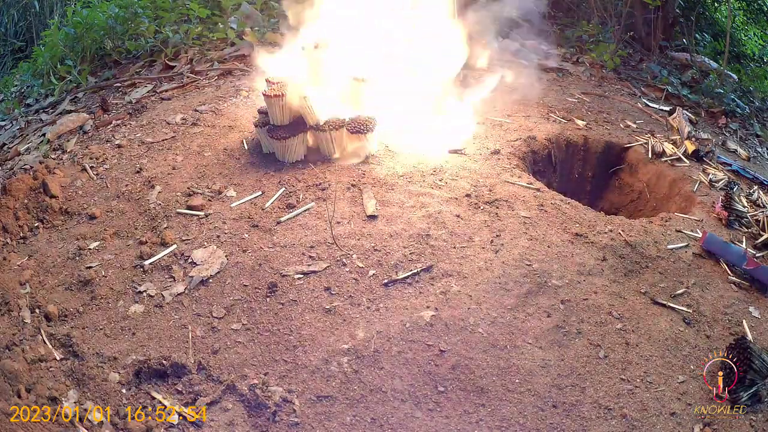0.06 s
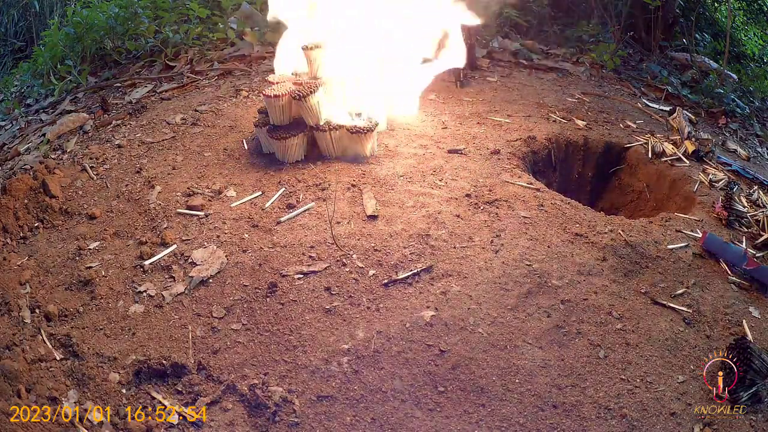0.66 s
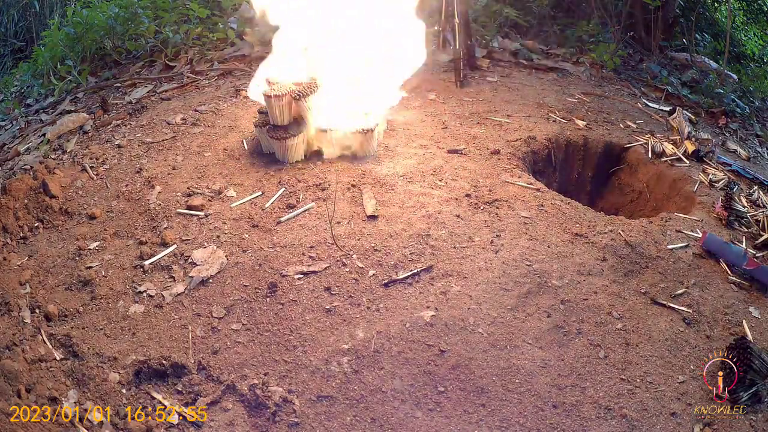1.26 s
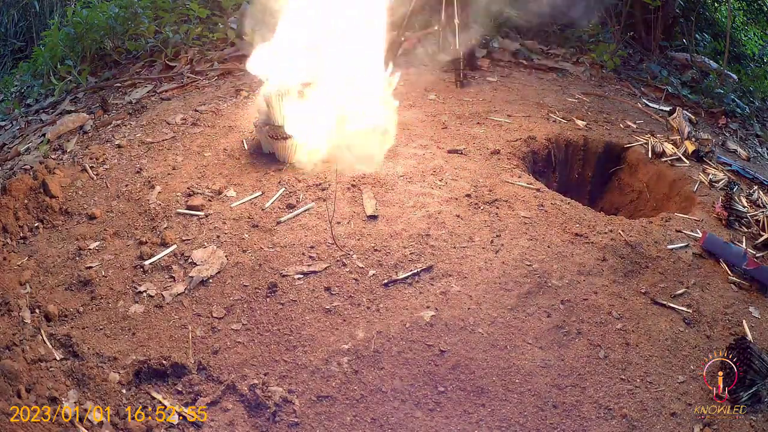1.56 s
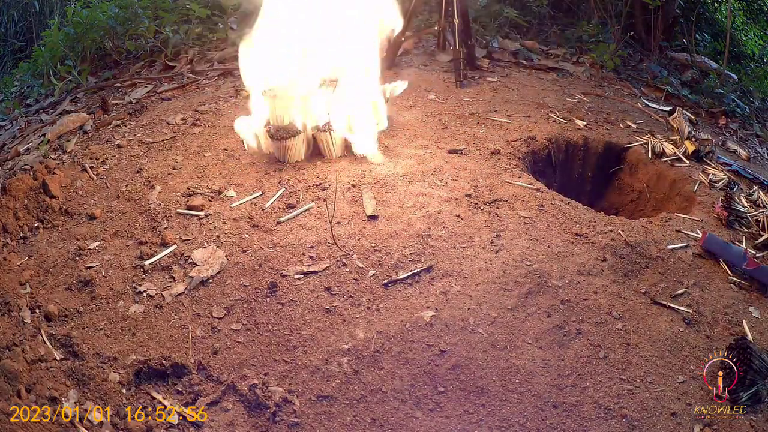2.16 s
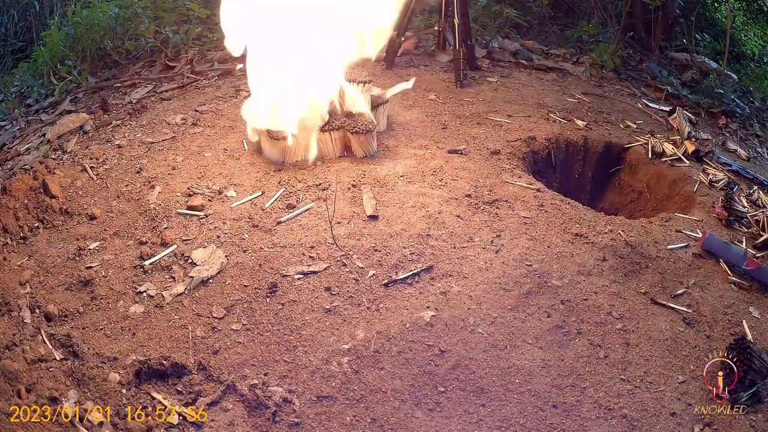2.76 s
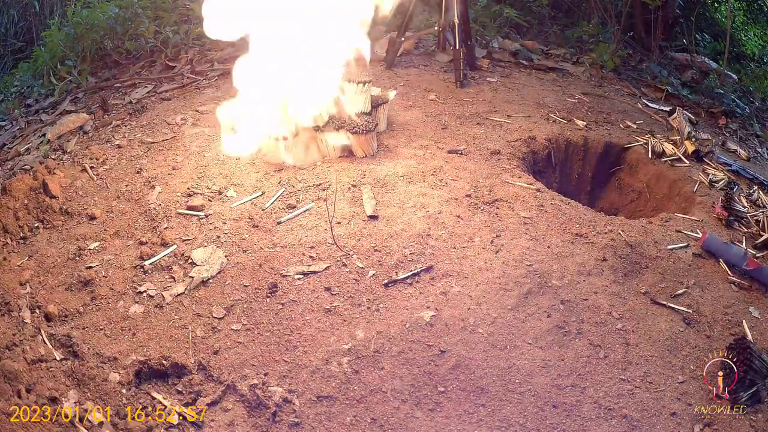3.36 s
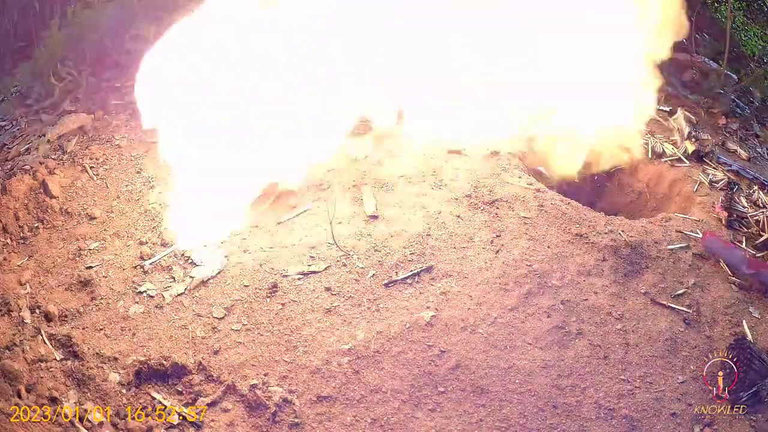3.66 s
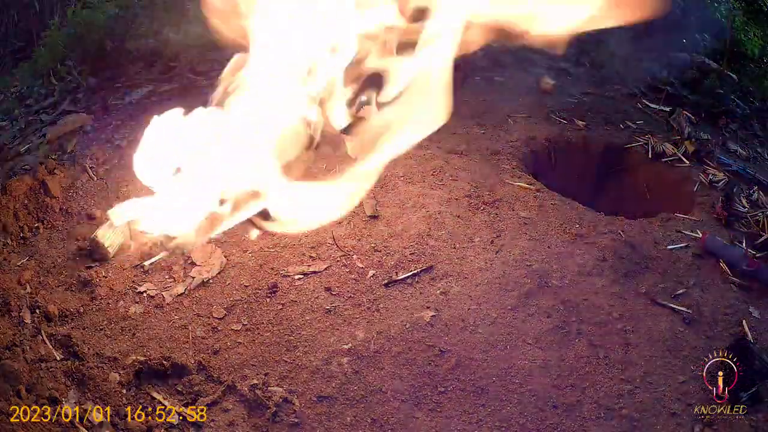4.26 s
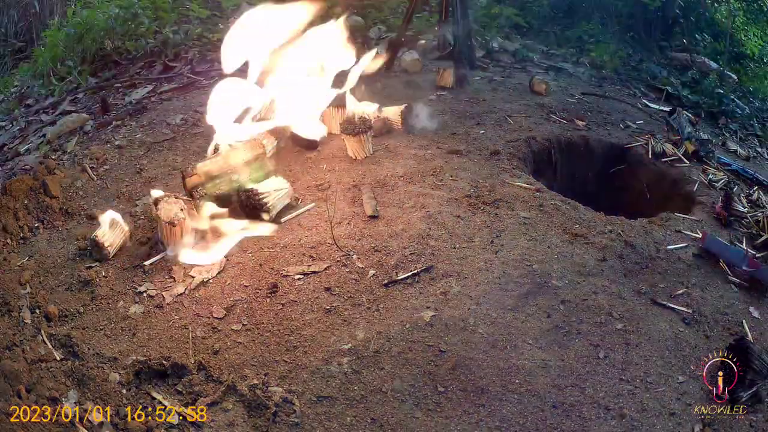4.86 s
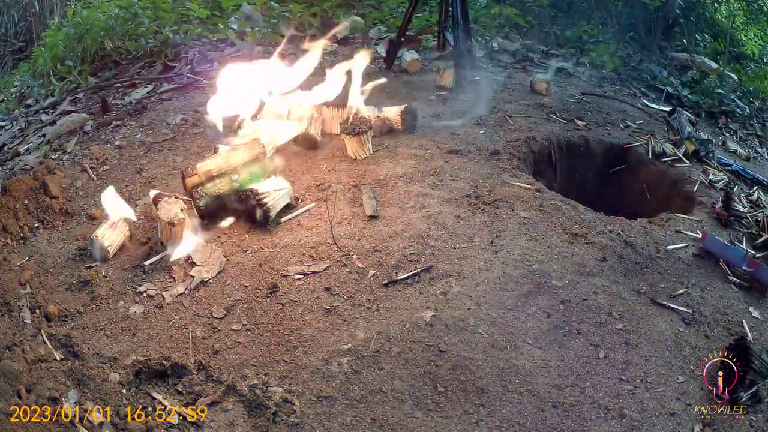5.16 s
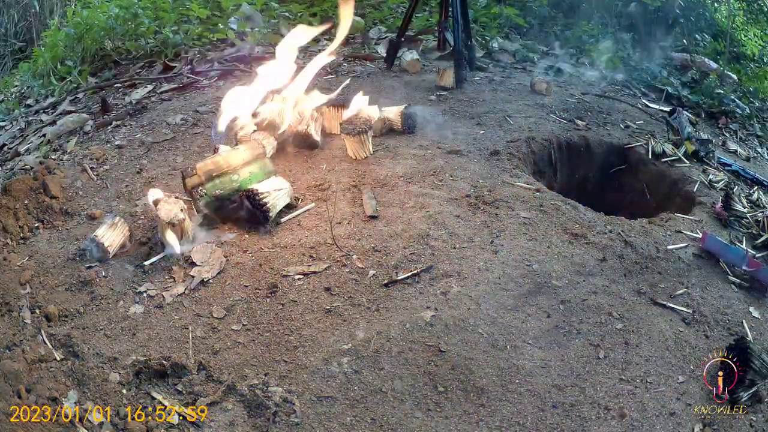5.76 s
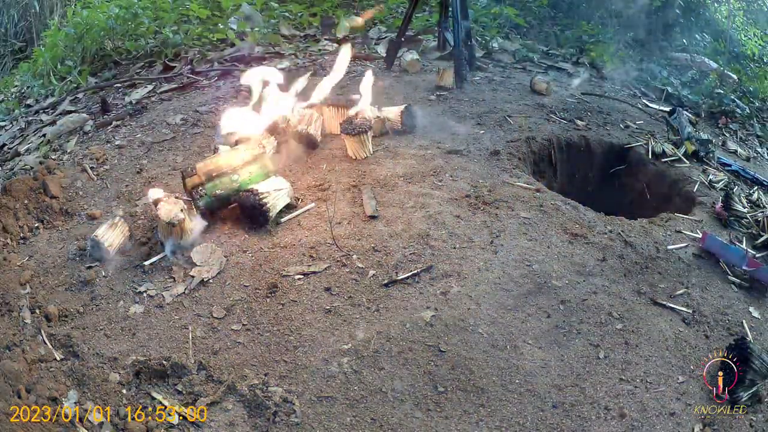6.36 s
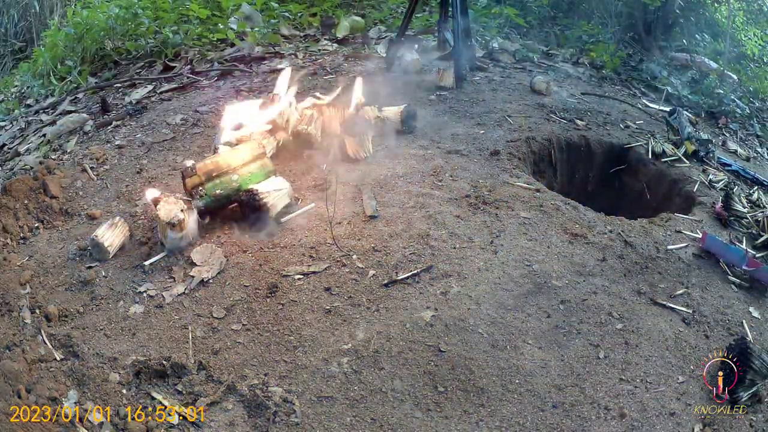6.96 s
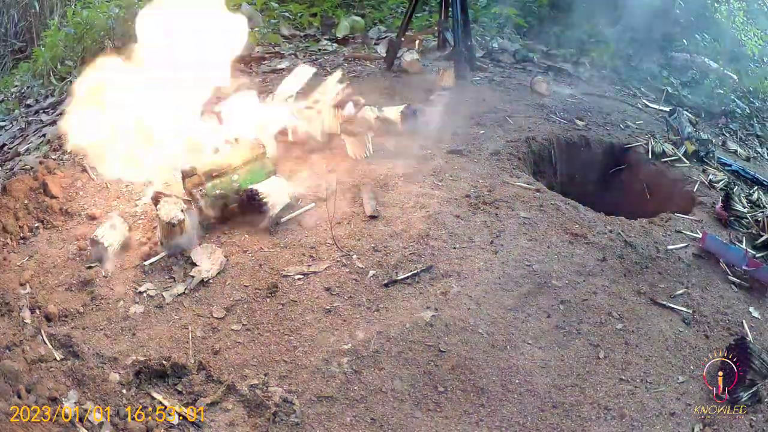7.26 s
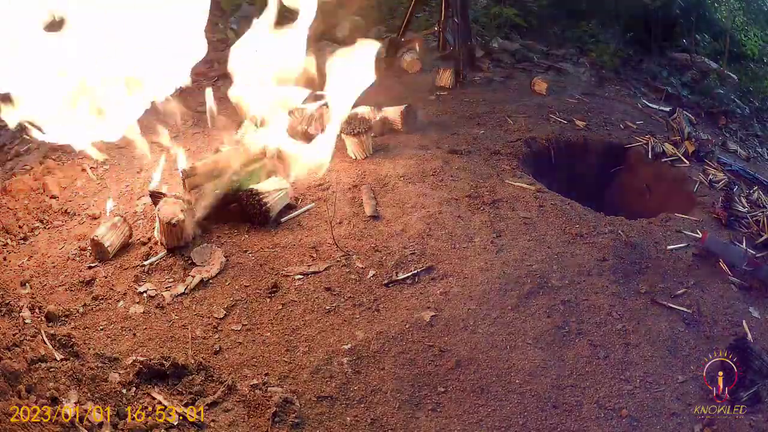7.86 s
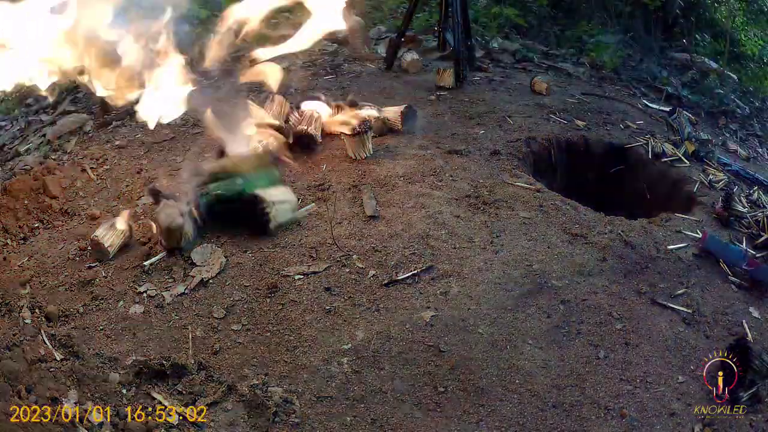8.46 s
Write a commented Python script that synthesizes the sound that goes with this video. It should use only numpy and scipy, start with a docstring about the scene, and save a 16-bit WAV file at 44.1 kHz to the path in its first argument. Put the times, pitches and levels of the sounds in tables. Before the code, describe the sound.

Bundles of matches flare with a sputtering roar outdoors, interrupted by a sharp firecracker bang, then flare again until a second bang.

```python
"""Bundles of matches flare on bare earth with a sputtering roar and a hiss. At 3.6 s a firecracker
bursts and scatters them, and the strewn heads go up in one whoosh. The fire sinks to a flutter with
small pops, and steady insects can be heard in the trees. At 7.2 s a second heap catches with a whoomph,
sizzles and pops, until another firecracker blows it out at 8.5 s. Both blasts overload the microphone."""
import sys
import numpy as np
from scipy import signal
from scipy.fft import rfft, irfft, next_fast_len
from scipy.io import wavfile
from scipy.ndimage import uniform_filter1d, map_coordinates

SR = 44100
rng = np.random.default_rng(int(sys.argv[2]) if len(sys.argv) > 2 else 0)


def materialize(psi):
    """Save the field psi as 16-bit PCM at rate SR to the path in sys.argv[1].

    A 1-D psi becomes a single channel; in a 2-D psi each row is a channel.
    """
    bounded = np.clip(np.atleast_2d(psi).T, -1, 1)
    quanta = np.round(bounded * 32767).astype(np.int16)
    wavfile.write(sys.argv[1], SR, quanta)


N = 383229

# The two firecrackers; a "fade" is the time to fall by 60 dB:
# (time [s], crack [dB], crack fade [s], snap [dB], gas jet [dB], jet length [s], jet fade [s])
FIRECRACKERS = [(3.591, 3, 0.064, -15.5, -11.5, 0.08, 0.11), (8.5152, 1, 0.087, -3.5, -21.5, 0.024, 0.15)]


def amp(db):
    """Turn decibels into a gain."""
    return np.exp(np.asarray(db) * np.log(10) / 20)


def unit(x):
    """Scale a signal to an average (rms) strength of 1."""
    return x / np.sqrt(np.mean(x ** 2) + 1e-20)


def clock():
    """The time of every sample, in seconds."""
    return np.arange(N) / SR


def curves(rows):
    """Join a table's rows with straight lines: one curve for each column after the time."""
    times, *columns = np.transpose(rows)
    return [np.interp(clock(), times, column) for column in columns]


def wobble(rate):
    """A smooth curve through `rate` random values a second."""
    t = clock()
    coarse = t[::100]
    values = rng.standard_normal(int(N * rate / SR) + 4)
    return np.interp(t, coarse, map_coordinates(values, [coarse * rate]))


def filtered(x, response):
    """Scale each frequency in x by the gain that response(hz) gives."""
    size = next_fast_len(N + SR // 4)
    return irfft(rfft(x, size) * response(np.fft.rfftfreq(size, 1 / SR)), size)[:N]


def coloured(x, tone):
    """Give x the balance of low and high notes in a tone table, at strength 1."""
    freqs, db = np.transpose(tone)
    return unit(filtered(x, lambda hz: amp(np.interp(np.log(hz + 1), np.log(freqs), db))))


def noise(tone):
    """Steady noise with the given tone, at strength 1."""
    return coloured(rng.standard_normal(N), tone)


def sputter(rate, spread_db, grain_db):
    """Rushing gas plus tiny ignitions of uneven size, about `rate` a second."""
    sizes = amp(spread_db * np.minimum(rng.exponential(size=N), 4))
    sparks = (rng.random(N) < rate / SR) * sizes
    return unit(rng.standard_normal(N) + amp(grain_db) * unit(sparks - sparks.mean()))


def alight(start, end, rise):
    """Heads catch within the rise time before the start and burn out quickly after the end."""
    t = clock()
    catch_db = -60 * np.maximum(start - t, 0) / rise
    burn_out_db = -60 * np.maximum(t - end, 0) / .25
    return amp(np.maximum(catch_db + burn_out_db, -120))


def forest():
    """Insects shrill steadily over a faint, even hiss."""
    # Tones of the insects and the air: (frequency [Hz], relative level [dB])
    insect_tone = [(3000, -40.5), (6600, -21.5), (7050, -5.5), (7400, 0.5), (7700, -6), (8100, -19.5),
                   (12000, -46)]
    air_tone = [(25, 0), (1000, 8.5), (6000, 0), (14500, -0.5), (16000, -7.5)]
    return amp(-61.5 + .7 * wobble(7.4)) * noise(insect_tone) + amp(-61.0) * noise(air_tone)


def wood_flames():
    """The sticks kindle slowly under the flare, then burn on with a soft flutter and faint crackles."""
    # Loudness of the small flames: (time [s], level [dB])
    levels = [(4.8, -48), (5.2, -54), (5.45, -51.5), (6.2, -52), (6.55, -55.5)]
    # Their tone: (frequency [Hz], relative level [dB])
    tone = [(25, -4), (130, 1.5), (450, 0.5), (900, -7), (2000, -16), (4000, -23), (15000, -28.5)]
    kindle_db_per_s = 4
    level_db = curves(levels)[0] - kindle_db_per_s * np.maximum(levels[0][0] - clock(), 0)
    return amp(level_db + .8 * wobble(18)) * coloured(sputter(170, 3.4, -5.0), tone)


def pops():
    """A bursting match head sends out one push and one pull of air pressure."""
    # Single bursting heads: (time [s], peak level [dB], pitch [Hz])
    bursts = [(4.841, -30, 750), (4.868, -31, 500), (4.911, -39, 600), (4.989, -36, 400),
              (5.161, -38.5, 1200), (5.406, -36, 448), (5.628, -39.5, 900), (6.226, -37, 500),
              (6.241, -30.5, 1300), (6.437, -36, 450), (6.8679, -30, 850), (7.012, -38.5, 600),
              (7.991, -16, 700), (8.021, -20, 1200), (8.137, -11, 595), (8.204, -15, 900)]
    out, t = np.zeros(N), np.arange(SR // 20) / SR
    for start, db, hz in bursts:
        cycles = t * hz
        pulse = np.sin(2 * np.pi * cycles) * cycles * np.exp(-4.5 * cycles)
        out[round(start * SR):][:len(t)] += amp(db) * pulse / np.abs(pulse).max()
    return out


def sizzle():
    """Fine jets spurt from the nearest heads of the second heap as one after another ignites."""
    # The spurts: (time [s], level [dB], hold [s])
    spurts = [(7.311, -33, 0.017), (7.46, -44, .07), (7.586, -39.5, .06), (7.712, -36.5, .045),
              (7.83, -38.5, .07), (7.99, -39, .06), (8.11, -36, .02), (8.228, -39.5, .07),
              (8.345, -38, .015)]
    # Their very high tone: (frequency [Hz], relative level [dB])
    tone = [(9500, -32), (11000, 0), (11900, 4.5), (12800, 4.5), (13800, -8.5), (15500, -21.5)]
    rise_s, fade_s, between_spurts_db = 0.04, .3, -47
    t = clock()
    power = (amp(between_spurts_db) * alight(spurts[0][0], spurts[-1][0] + .07, rise=.03)) ** 2
    for start, db, hold in spurts:
        rise_db = -20 * np.maximum(start - t, 0) / rise_s
        fade_db = -60 * np.maximum(t - start - hold, 0) / fade_s
        power += amp(db + rise_db + fade_db) ** 2
    return np.sqrt(power) * amp(1.5 * wobble(45)) * coloured(sputter(900, 3, -2.5), tone)


def gusts():
    """Gusts of gas from the flares and blasts buffet the microphone with low puffs and thumps."""
    # The gusts: (time [s], level [dB], 20 dB rise [s], hold [s], fade [s], treble cutoff [Hz])
    puffs = [(3.683, -8, 0.03, 0.03, 0.17, 200), (3.697, -12.5, 0.012, 0.033, 0.094, 95),
             (3.777, -33, 0.018, 0.022, 0.24, 120), (4.579, -42, .01, .012, .1, 150),
             (7.198, -47.5, 0.06, 0.035, .1, 450), (7.29, -12, 0.012, 0.016, 0.1, 340),
             (8.54, 0, 0.022, 0.012, 0.11, 105.4), (8.585, -22.5, .03, 0.062, .42, 200)]
    out, t = np.zeros(N), clock()
    hz = np.fft.rfftfreq(2 * SR, 1 / SR)
    for start, db, rise, hold, fade, cutoff_hz in puffs:
        near = (t > start - .5) & (t < start + 1)
        bass_band = hz / np.hypot(hz, 35) / np.hypot(1, (hz / cutoff_hz) ** 1.89)
        swirls = irfft(rfft(rng.standard_normal(2 * SR)) * bass_band)[:near.sum()]
        swirls /= np.sqrt(np.abs(uniform_filter1d(swirls ** 2, size=1800)) + 1e-12)  # an even push
        age = t[near] - start
        rise_db = -20 * np.maximum(-age, 0) / rise
        fade_db = -60 * np.maximum(age - hold, 0) / fade
        out[near] += swirls * amp(db + rise_db + fade_db)
    return out


def echo_and_shade(x, echo_dip, shade_db, dip_octaves):
    """The ground echo cuts a band that moves with flame height; tongues of flame lift and shade others."""
    hz, t, spectrum = signal.stft(x, SR, nperseg=512)
    times, centre_hz, cut_db = np.transpose(echo_dip)
    offset = np.log2((hz[:, None] + 1) / np.interp(t, times, centre_hz)) / dip_octaves
    dip_db = np.interp(t, times, cut_db) * np.exp(-offset ** 2)  # a negative cut is a boost
    patches = uniform_filter1d(rng.standard_normal(spectrum.shape), size=10, axis=0)
    patches = unit(uniform_filter1d(patches, size=18, axis=1))  # now smooth in both pitch and time
    reach = np.sqrt(hz[:, None] / hz[-1])  # high notes are shaded most
    return signal.istft(spectrum * amp(shade_db * reach * patches - dip_db), nperseg=512)[1][:N]


def flare(roar_db, hiss_db, rumble_db, tone, gas, flicker_db, hiss_flicker_db):
    """Burning match heads: the rising plume rumbles, the gas roars and the heads hiss."""
    burn = coloured(gas, tone)
    bass = filtered(burn, lambda hz: 1 / (1 + (hz / 381) ** 8))
    bass_and_middle = filtered(burn, lambda hz: 1 / (1 + (hz / 3860) ** 8))
    flicker = flicker_db * wobble(22)
    rumble = unit(bass) * amp(rumble_db + 0.72 * wobble(25))
    roar = unit(bass_and_middle - bass) * amp(roar_db + flicker)
    hiss = unit(burn - bass_and_middle) * amp(hiss_db + flicker + hiss_flicker_db * wobble(35))
    return rumble + roar + hiss


def first_heap():
    """The bundles flare until the first firecracker scatters them; the plume rumbles more as it grows."""
    # Loudness of the flare: (time [s], roar [dB], hiss [dB])
    levels = [(0.0, -24.5, -38), (0.16, -24, -37.5), (0.32, -27, -39.5), (1.04, -24.5, -35),
              (1.23, -25, -37.5), (1.44, -21, -33), (1.7, -24.5, -40.5), (1.86, -24.5, -38),
              (2.28, -25, -35), (2.31, -24.5, -36.5), (2.98, -26.5, -38.5), (3.32, -24, -36),
              (3.36, -23, -33), (3.55, -26, -40.5)]
    # Its tone: (frequency [Hz], relative level [dB])
    tone = [(25, -15), (120, -11.5), (250, -8), (380, -2.5), (1000, 0.5), (1600, -0.5), (1950, -5.5),
            (2400, -6), (3800, -17), (5500, -15.5), (7800, -16.5), (10000, -35.5), (12600, -27.5),
            (15500, -41.5)]
    # The band its ground echo cancels: (time [s], frequency [Hz], cut [dB])
    echo_dip = [(0, 4200, -2.5), (.5, 3800, 5), (1.7, 4100, 5.5), (1.95, 3500, -2.5), (2.6, 2200, 0.5),
                (3.0, 2150, 5)]
    roar_db, hiss_db = curves(levels)
    rumble_db = roar_db - 16.5 + 1.42 * clock()
    gas = echo_and_shade(sputter(1800, 2.1, -6), echo_dip, shade_db=3.0, dip_octaves=0.24)
    fire = flare(roar_db, hiss_db, rumble_db, tone, gas, flicker_db=0.28, hiss_flicker_db=0.55)
    return alight(0, FIRECRACKERS[0][0], rise=.1) * fire


def scattered_heads():
    """The strewn heads go up in one whoosh and die away; hiss and rumble follow the roar."""
    # Loudness of the whoosh: (time [s], roar [dB])
    levels = [(3.78, -35), (3.898, -24), (4.102, -30.5), (4.16, -35), (4.504, -36), (4.682, -42),
              (4.78, -63)]
    # Its tone: (frequency [Hz], relative level [dB])
    tone = [(25, -14.5), (130, -3), (240, -5.5), (450, -1.5), (700, -4), (1600, -4.5), (2100, -12),
            (2800, -14.5), (4000, -22), (7800, -22), (10000, -32.5), (12500, -29), (15500, -42)]
    # The band its ground echo cancels: (time [s], frequency [Hz], cut [dB])
    echo_dip = [(4.05, 4000, 2.6), (4.2, 2650, 7.5), (4.5, 2760, 8.5)]
    start, end = levels[0][0], levels[-1][0]
    age = np.maximum(clock() - start, 0)
    roar_db = curves(levels)[0]
    hiss_db = roar_db - 20.5
    rumble_db = roar_db - 6.5 - 6 * age  # sinks faster than the roar as the fireball lifts away
    gas = echo_and_shade(sputter(1200, 2.5, -6), echo_dip, shade_db=3.5, dip_octaves=0.38)
    fire = flare(roar_db, hiss_db, rumble_db, tone, gas, flicker_db=0.5, hiss_flicker_db=0.6)
    return alight(start, end, rise=.3) * fire


def second_heap():
    """The second heap catches at once, swells and burns steadily until the blast snuffs it."""
    # Tone of its flare: (frequency [Hz], relative level [dB])
    tone = [(25, -8), (100, 3.5), (450, 2), (1000, -3.5), (1650, -4.5), (2400, -14.5), (4500, -20),
            (6500, -22.5), (8300, -21.5), (10200, -32.5), (12400, -30), (14300, -37.5), (15500, -34)]
    # The band its ground echo cancels: (time [s], frequency [Hz], cut [dB])
    echo_dip = [(7.24, 4000, 3.5), (7.55, 3800, 1.3), (7.7, 6030, 1), (8.0, 6130, 10), (8.35, 5830, 1.8)]
    catch_s, swell_s, blown_out_s = 7.237, .1, 8.54
    snuff_db_per_s, hiss_fade_db_per_s = 156, 1  # the hiss fades as the heads are used up
    t = clock()
    age = np.maximum(t - catch_s, 0)
    unlit = np.maximum(1 - age / swell_s, 0)  # falls from 1 to 0 at full burn
    snuff_db = snuff_db_per_s * np.maximum(t - blown_out_s, 0)
    burn_db = -6.5 * unlit - snuff_db
    roar_db, rumble_db = burn_db - 27, burn_db - 32.5
    hiss_db = -36.5 - 16.5 * unlit - hiss_fade_db_per_s * age - snuff_db
    gas = echo_and_shade(sputter(800, 2.4, -6.5), echo_dip, shade_db=5.0, dip_octaves=0.23)
    fire = flare(roar_db, hiss_db, rumble_db, tone, gas, flicker_db=0.05, hiss_flicker_db=1.0)
    return alight(catch_s, t[-1], rise=.002) * fire


def firecrackers():
    """The case splits with a crack and a bright snap, then the remaining powder vents as a rough jet."""
    # Tones of the crack, the snap and the jet: (frequency [Hz], relative level [dB])
    crack_tone = [(40, -3.5), (300, 5), (800, 1), (1500, 0), (3000, -9.5), (8000, -29), (10000, -38),
                  (16000, -45.5)]
    snap_tone = [(500, -23), (3000, -14.5), (4700, 4), (8000, -10), (9500, -39), (16000, -45.5)]
    jet_tone = [(40, -15), (200, -9.5), (450, -1.5), (800, 1), (1600, -2), (2700, -7.5), (4500, -19),
                (7800, -16), (10000, -32), (13000, -24.5), (16000, -42)]
    out, t = np.zeros(N), clock()
    crack, snap = noise(crack_tone), noise(snap_tone)
    jet = coloured(sputter(900, 1.6, -1), jet_tone) * amp(1.1 * wobble(120))
    for start, crack_db, crack_fade, snap_db, jet_db, jet_length, jet_fade in FIRECRACKERS:
        after = (t > start) & (t < start + 1)
        age = t[after] - start
        burst = amp(crack_db) * crack[after] + amp(snap_db) * snap[after]
        vent = jet[after] * amp(jet_db - 60 * np.maximum(age - jet_length, 0) / jet_fade)
        out[after] += burst * amp(-60 * age / crack_fade) + vent
    return out


def scene():
    """Fire, blasts and forest added together in one channel."""
    matches = first_heap() + scattered_heads() + second_heap()
    return (matches + sizzle() + wood_flames() + pops() + firecrackers() + gusts() + forest())[None]


def record(dry):
    """The overloaded microphone flattens the loudest peaks with some fizz; the highest treble is cut."""
    ceiling, hardness, top_hz = amp(-4), 6, 15700
    sound = dry[0]
    clipped = sound / (1 + np.abs(sound / ceiling) ** hardness) ** (1 / hardness)
    fizz = filtered(sound - clipped, lambda hz: hz ** 2 / (hz ** 2 + 2500 ** 2))
    return filtered(clipped + amp(-16) * fizz, lambda hz: hz < top_hz)[None]


dry = scene()
out = record(dry)
materialize(out)
```